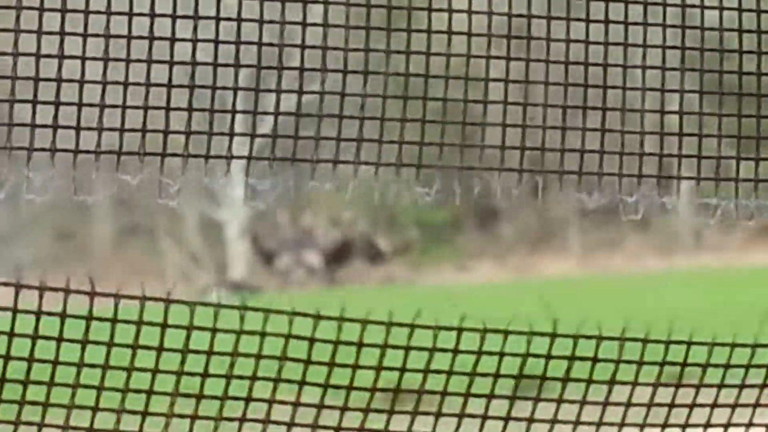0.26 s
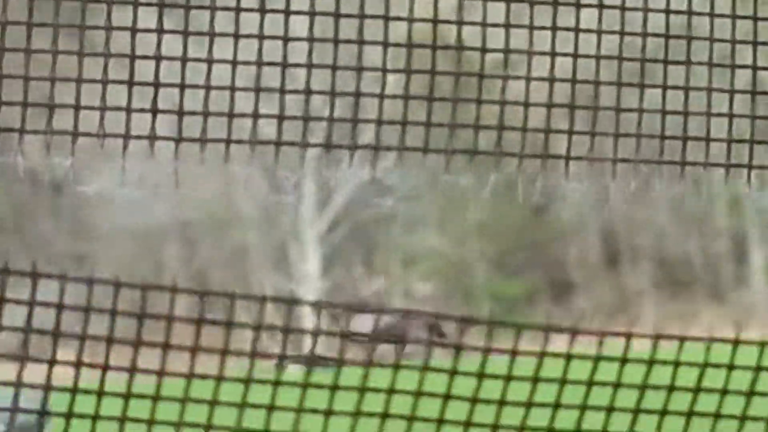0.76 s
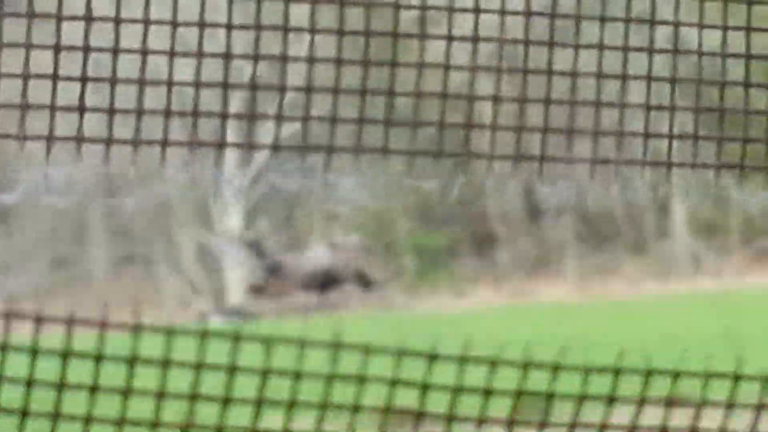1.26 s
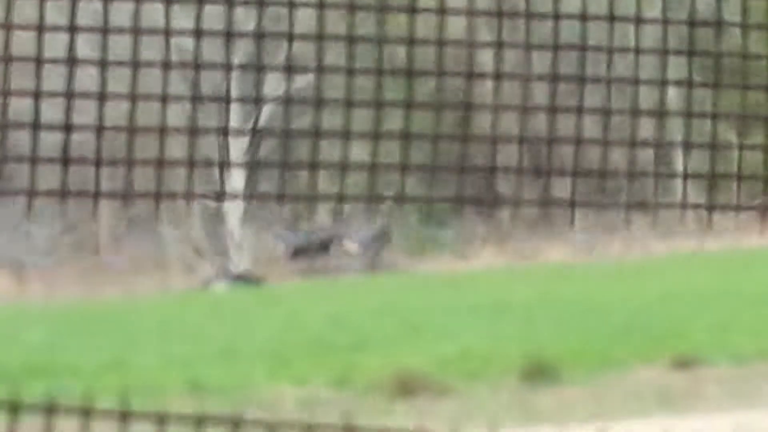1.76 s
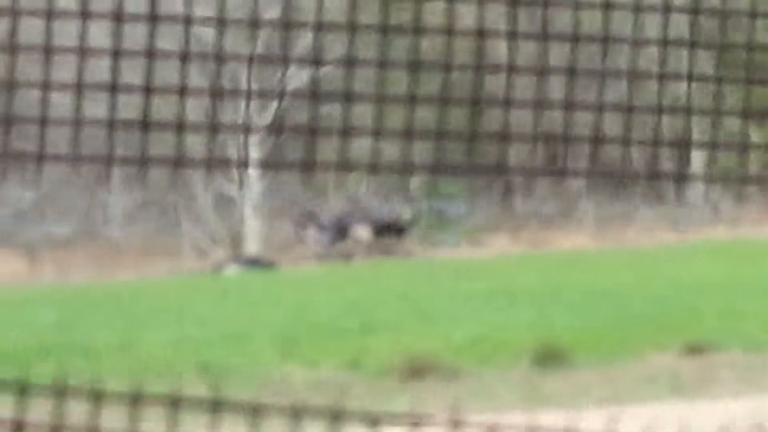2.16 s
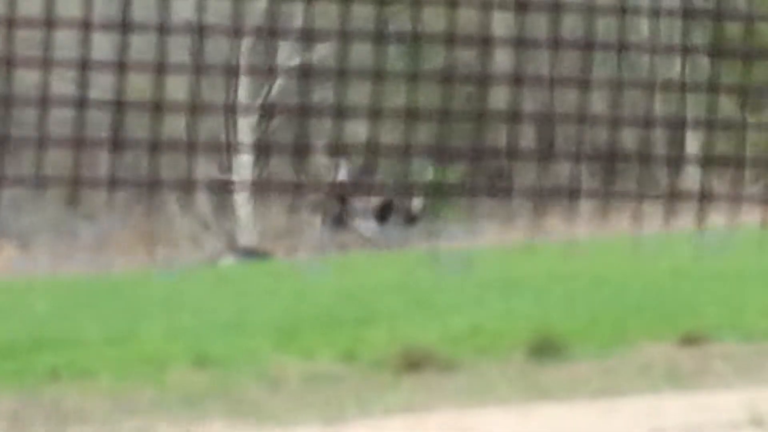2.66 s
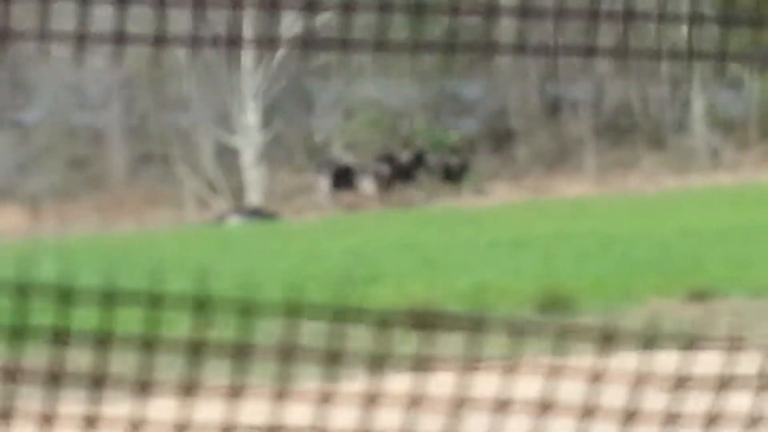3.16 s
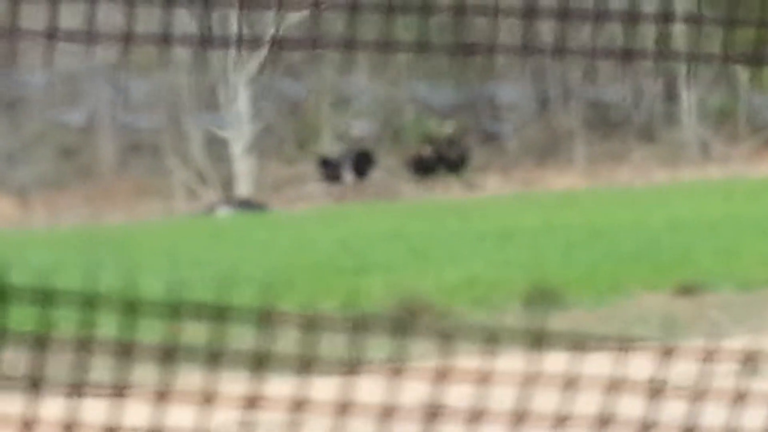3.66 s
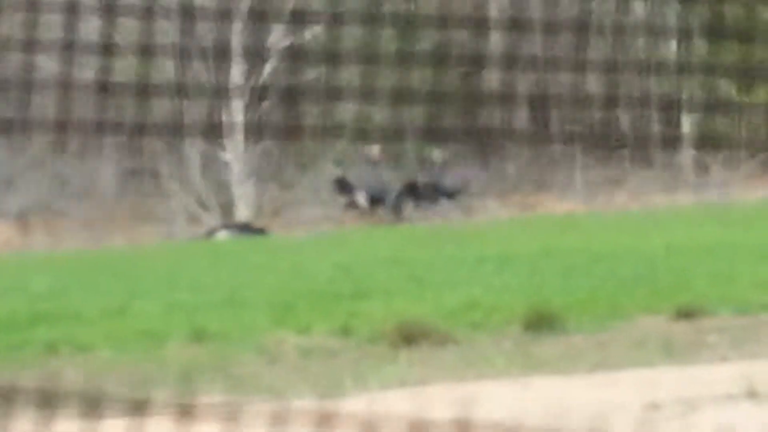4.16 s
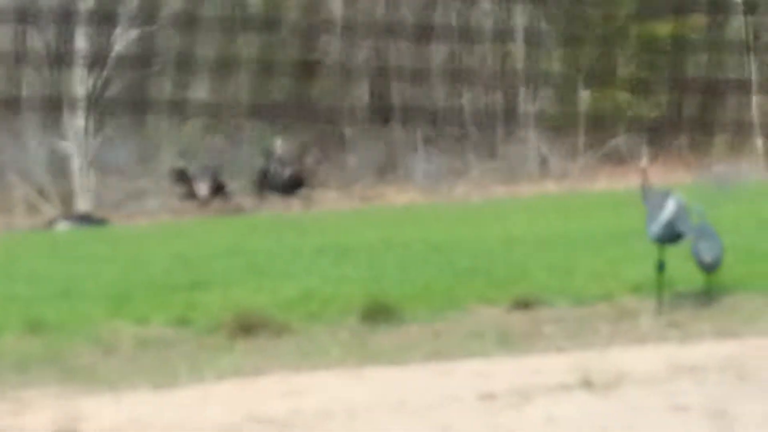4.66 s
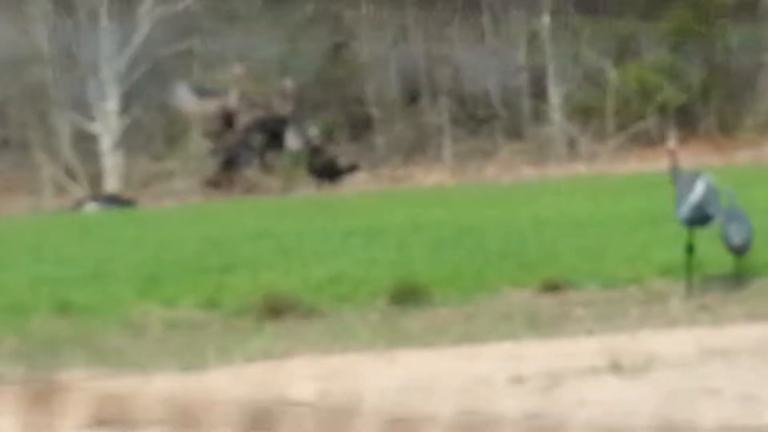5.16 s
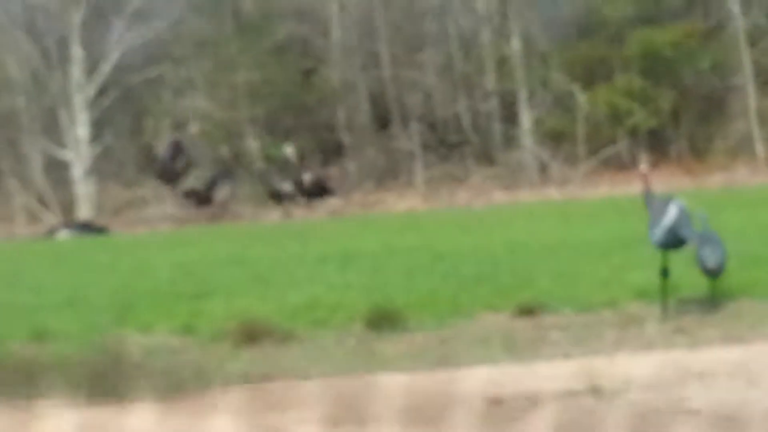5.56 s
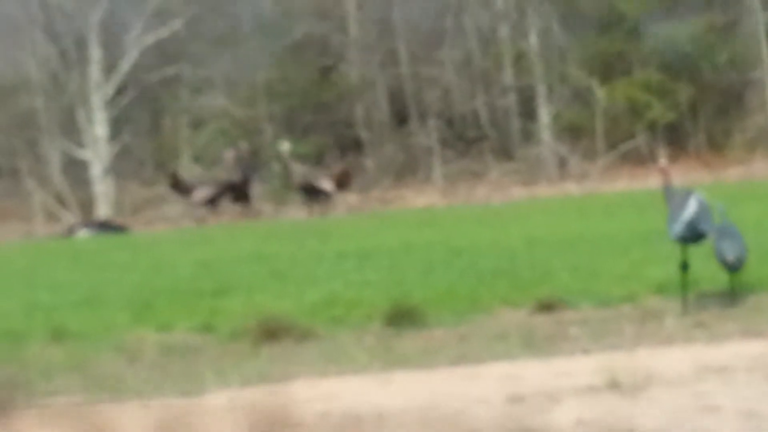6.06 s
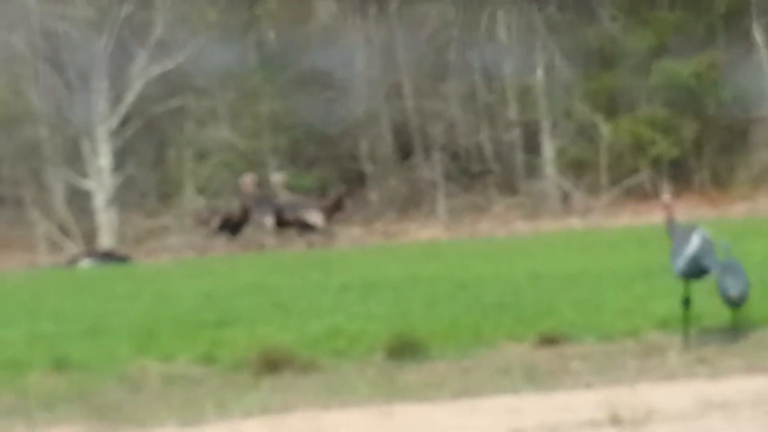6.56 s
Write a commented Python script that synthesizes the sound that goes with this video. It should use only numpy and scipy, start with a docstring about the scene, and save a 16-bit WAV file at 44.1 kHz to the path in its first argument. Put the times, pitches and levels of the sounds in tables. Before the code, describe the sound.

Wild turkeys fight at the far edge of a field, with irregular wing slaps, faint clucks and thin whines. Close to the microphone, the fabric of a hide crackles, mostly on the right, and a hand-held camera creaks, clicks and thuds. From about halfway, a songbird whistles short falling and rising notes in the wood. The slaps and handling noises flare up after five seconds, over a faint low rumble and hiss.

```python
"""The far edge of a field, heard from a cloth hide: wild turkeys fight with wing slaps, clucks and
thin whines, and a songbird whistles in the wood behind. Up close, fabric crackles, mostly on the right,
and a hand-held camera's housing creaks, rings under finger taps and thuds against the hand.
Rumble drifts underneath; field hiss and rustle swell briefly as the recorder's noise suppressor opens."""
import sys
import numpy as np
from scipy import signal
from scipy.fft import rfft, irfft
from scipy.io import wavfile
from scipy.ndimage import uniform_filter1d

SR = 44100
rng = np.random.default_rng(int(sys.argv[2]) if len(sys.argv) > 2 else 0)


def digitize_waveform(pressure):
    """Quantize a signal to 16-bit integers and store it at the path in sys.argv[1].

    Rows of a 2-D input are taken as channels; values are limited to [-1, 1].
    """
    field = np.atleast_2d(pressure).T
    bounded = np.clip(field, -1, 1)
    quanta = np.round(bounded * 32767).astype(np.int16)
    wavfile.write(sys.argv[1], SR, quanta)


N = 299517
T = np.arange(N) / SR

# Tone colours of the three noise beds. Each row: frequency in Hz, relative level in dB.
RUMBLE_COLOUR = [(15, -21), (25, -15), (38, -16), (75, 0.5), (112, -1.5), (182, -4), (300, -23.5),
                 (390, -50), (660, -120)]
FIELD_COLOUR = [(150, -26.5), (260, -6.5), (747, -3.5), (872, -7), (1150, -1.5), (1580, -7.5), (2420, -6.5),
                (3600, -26), (4680, -21), (7920, -120)]
RUSTLE_COLOUR = [(1880, -38), (3200, -11), (3670, -8), (5260, 0.5), (6600, -4), (7760, 0), (9360, -7.5),
                 (13900, -6.5), (14700, -20.5), (15000, -26.5)]
# Width of the beds. Each row: frequency in Hz, share of power common to both microphone ports.
BED_COMMON_SHARE = [(60, 0.99), (200, 0.91), (400, 0.7), (1400, 0.28), (3000, 0.19), (8000, 0.58)]
# Lean of the beds. Each row: frequency in Hz, pan in dB (always left minus right).
BED_PAN = [(60, -2), (110, -1), (200, 2), (380, 6), (700, 0), (1290, 0), (2380, 6), (4400, 4), (8120, -9.5),
           (15000, 1)]
# Slow rides on the beds. Each row: time in seconds, then rumble, field and rustle levels in dB.
BED_LEVELS = [(0, -56.5, -62.5, -66.5), (.3, -57, -65, -60.5), (.62, -60, -67.5, -70),
              (.95, -55.5, -66, -59.5), (1.4, -56, -61.5, -70), (1.75, -56.5, -61.5, -64.5),
              (2.1, -61, -69, -69), (2.4, -57.5, -60, -73.5), (2.645, -50, -50.5, -49.5),
              (2.685, -54, -62, -65), (2.95, -60.5, -64, -65.5), (3.5, -58, -59.5, -58.5),
              (3.9, -56.5, -63, -61), (4.3, -58, -64, -66), (4.85, -62, -64.5, -70),
              (5.15, -48, -53.5, -46), (5.62, -56, -52.5, -53), (5.85, -60, -58.5, -63),
              (6.3, -60, -63.5, -68.5), (6.65, -61, -65.5, -68), (6.79, -54, -56, -78)]
# Background hiss and rustle swell briefly with each sound, as the recorder's noise suppressor opens.
# Each row: crest in seconds, field and rustle levels in dB, seconds to fall 20 dB (a negative value
# cuts the swell short or skips it).
BACKGROUND_SWELLS = [(0.072, -60, -60, 0.47), (0.401, -70, -44, 0.01), (0.452, -63, -45.5, 0.05),
                     (.76, -64.5, -72, 0.15), (0.912, -49, -38, 0.0629), (.95, -52, -47, 0.1),
                     (0.999, -50.5, -44, 0.13), (1.177, -53, -55, 0.11), (1.229, -55.5, -54, 0.08),
                     (1.298, -71, -52.5, 0.2), (1.518, -55, -56, 0.29), (2.32, -64, -64, 0.3),
                     (2.722, -55.5, -45, 0.1743), (2.84, -62, -41, -0.01), (3.19, -64, -61, -0.19),
                     (3.302, -62, -43.5, 0.08), (3.558, -59, -49, 0.05), (3.88, -60, -69, 0.45),
                     (4.29, -68, -60, .1), (4.38, -57.5, -57.5, 0.27), (4.515, -58.5, -61.5, 0.26),
                     (4.588, -52.5, -60, .07), (4.78, -55, -57, 0.19), (4.97, -58.5, -61, -0.3),
                     (5.06, -47, -51, -0.02), (5.137, -35.5, -35, 0.0228), (5.309, -47.5, -45, 0.12),
                     (5.41, -39, -62, 0.01), (5.453, -38.5, -54, 0.03), (5.58, -52, -54, 0.16),
                     (5.99, -60.5, -59, 0.23), (6.408, -56.5, -55, 0.15), (6.6, -56, -57, -0.3),
                     (6.741, -56.5, -55, 0.35)]
# Wing hits. Each row: start in seconds, level in dB, centre in Hz, pan in dB, 60 dB decay in seconds.
WING_SLAPS = [(0.075, -44.5, 1310, 1, 0.081), (0.154, -47, 1210, 17, 0.048),
              (0.392, -30, 2300, 19.5, 0.027), (0.69, -54.5, 1280, 1.0, 0.053),
              (0.846, -36, 2100, 12, 0.026), (0.898, -37.5, 2090, 3, 0.14), (0.999, -40.5, 2260, 6.5, 0.11),
              (1.173, -36, 1900, 2, 0.064), (1.524, -35.5, 1850, 10, 0.041), (1.723, -54.5, 2280, 16, 0.06),
              (1.776, -42.5, 1840, 4, 0.055), (1.937, -50, 1130, 2, 0.048), (2.41, -47, 2170, 4, 0.07),
              (2.492, -56, 1180, 19, 0.096), (2.702, -47, 2270, 7, 0.34), (2.956, -51, 2270, 7, 0.085),
              (3.054, -52.5, 1850, 4.5, 0.15), (3.168, -53.5, 1160, 11, 0.082),
              (3.202, -44.5, 1350, 2, 0.043), (3.273, -53.5, 1370, 3, 0.099), (3.31, -42, 1800, 5, 0.038),
              (3.347, -40.5, 1920, 9, 0.035), (3.386, -46.5, 1370, 4, 0.093), (3.432, -44, 1970, 9, 0.048),
              (3.508, -47, 2000, 2, 0.16), (3.874, -40, 1900, 16, 0.065), (4.024, -49, 1350, 7.5, 0.11),
              (4.149, -48.5, 1920, 3, 0.084), (4.514, -45, 1980, 7, 0.062), (4.576, -45, 2170, 10, 0.031),
              (5.051, -28, 2220, 8.5, 0.049), (5.212, -48, 2270, 6, 0.1), (5.305, -41, 2210, 5, 0.22),
              (5.396, -30, 1970, 8, 0.038), (5.452, -31, 2500, 3, 0.042), (5.75, -44, 1770, 1, 0.086),
              (5.858, -40, 1320, 8, 0.055), (6.295, -53, 1310, 2, 0.055), (6.335, -51, 1300, 4, 0.084),
              (6.37, -49, 1390, 4, 0.087), (6.405, -38.5, 1600, 0, 0.054), (6.709, -51, 1285, 5, 0.2)]
# Fabric snaps. Each row: start in seconds, level in dB, pan in dB, relative tail level in dB.
FABRIC_CRACKLES = [(0.0757, -26.5, -9.5, -19), (0.2562, -42, -3, -9), (.332, -41.5, -6, -12.5),
                   (0.372, -42, 5, -10), (0.3955, -30, 4, -14), (0.8443, -33, -3, -18),
                   (0.8985, -16.5, -10, -14.5), (0.9018, -8, -11.5, -20), (0.9126, -25, 3, -10),
                   (0.9992, -25.5, -2, -13), (1.0572, -38, 0, -9.5), (1.1724, -30.5, -16, -9),
                   (1.1735, -29, 4.5, -11.5), (1.501, -35, -6, -15), (1.519, -52, 21, -9),
                   (2.315, -39.5, -2, -13), (2.701, -47, -6, -23), (2.716, -25.5, -11, -13),
                   (2.7899, -33, -8, -16), (2.833, -32, 1.5, -17.5), (3.1882, -35, -0.5, -14.5),
                   (3.2863, -39.5, -18, -6), (3.5452, -39, -20, -11.5), (3.5641, -35.5, -23, -23),
                   (4.0294, -41.5, -4, -9.5), (4.3729, -40.5, -15, -10.5), (4.78, -38.5, -9, -14.5),
                   (4.9226, -41, 4.5, -11.5), (4.967, -35, 6.5, -13), (5.0503, -23.5, -15.5, -6.5),
                   (5.0704, -30, -10, -26), (5.0946, -32.5, -6, -10.5), (5.1233, -21, -4, -15),
                   (5.1354, -20, -13, -31), (5.1562, -19, -16, -20), (5.164, -32, -13, -10),
                   (5.254, -22.5, -13.5, -16.5), (5.2623, -23.5, -7, -11.5), (5.2983, -23, -12, -14.5),
                   (5.3075, -22.5, -18, -9), (5.316, -31, -7, -26), (5.3484, -32, -11, -10.5),
                   (5.4531, -12.5, -8, -18.5), (5.6331, -34, 0, -14), (5.7948, -44, -5.5, -8.5)]
# Port resonances, a left list and a right list. Each row: centre in Hz, width in Hz, gain in dB.
PORT_MODES = [
    [(5100, 1580, 9.5), (6900, 9800, -6), (11570, 11000, -7)],
    [(5240, 1200, -15), (7550, 1480, 10.5), (9800, 3800, -14)],
]
# Turkey clucks. Each row: start and length in seconds, first pitch, last pitch and throat
# resonance in Hz, level in dB.
TURKEY_CLUCKS = [(.145, 0.035, 900, 1050, 1900, -52), (0.387, 0.012, 591, 563, 2400, -41.5),
                 (0.835, 0.035, 845, 1210, 1900, -45), (1.517, 0.025, 518.5, 517, 1980, -42),
                 (1.618, .025, 1054, 1053, 2100, -58), (1.772, 0.035, 890, 893, 1900, -52.5),
                 (3.27, 0.022, 883, 900, 1600, -66), (3.304, 0.02, 890, 900, 1800, -58),
                 (3.34, 0.024, 880, 900, 2040, -53), (3.379, 0.021, 963, 960, 1710, -61),
                 (3.428, 0.037, 980, 980, 1760, -54), (3.504, .03, 950, 1000, 1900, -56),
                 (3.576, .04, 750, 750, 1600, -57), (3.872, 0.028, 460.4, 464, 1924, -48),
                 (5.854, 0.017, 1266, 1306, 1500, -49)]
# Thuds of the hand. Each row: start in seconds, level in dB, centre in Hz.
HAND_BUMPS = [(0.368, -48, 121), (0.408, -44, 91.5), (0.755, -45, 127), (0.919, -35.5, 91.5),
              (0.943, -39, 199), (1.004, -40, 211), (1.174, -36, 186), (1.519, -49, 116),
              (2.609, -48, 176.4), (2.717, -40, 145), (3.719, -49, 112), (4.588, -45.5, 91.5),
              (5.053, -28.5, 140), (5.205, -38.5, 121), (5.6, -47, 132), (6.388, -43, 116),
              (6.711, -44.5, 118)]
# Taps on the housing. Each row: start in seconds, left level in dB, pan in dB, relative edge level
# in dB, contact time in seconds.
FINGER_TAPS = [(0.371, -45, 10, -30, 0.0012), (1.178, -24, 0, -18, 0.0014), (1.221, -16.5, 11, -30, 0.0017),
               (5.133, -23, 35, -12.5, 0.00028), (5.1363, -2, 41, 2.5, 0.00013),
               (5.4055, -16.5, 12.5, 11.5, 0.00017)]
# The housing's ring. Each row: frequency in Hz, gain in dB, 60 dB decay in seconds.
SHELL_MODES = [(427, -15.5, 0.013), (802, -1, 0.0083), (1466, 4.5, 0.0042)]
# Whines and peeps. Each row: start, crest and end in seconds, the pitch at each in Hz, level in dB.
# A row that ends before it starts is silent.
TURKEY_WHINES = [(1.248, 1.402, 1.47, 1320, 1228, 1150, -68.5), (1.539, 1.556, 1.66, 1566, 1546, 1520, -61),
                 (1.66, 1.717, 1.77, 2416, 2550, 2370, -68), (1.876, 1.962, 1.98, 2260, 2605, 2560, -69.5),
                 (1.75, 1.823, 1.88, 2450, 2590, 2400, -78), (2.002, 2.05, 2.4, 2560, 2605, 2530, -79),
                 (2.1, 2.2, 2.3, 2390, 2605, 2528, -71.5), (2.3, 2.33, 2.36, 2383, 2266, 2290, -57),
                 (2.403, 2.429, 2.4, 2475, 2325, 2600, -66), (2.45, 2.53, 2.55, 2640, 2590, 2542, -66),
                 (2.47, 2.497, 2.49, 3298, 3390, 3228, -63.5),
                 (2.791, 2.828, 2.88, 2431, 2225, 2156, -56.5), (3.01, 3.048, 3.1, 3210, 3390, 3400, -66),
                 (3.628, 3.738, 3.8, 1236, 1265, 1180, -64), (3.65, 3.672, 3.72, 2505, 2506, 2460, -57),
                 (3.73, 3.76, 3.79, 1890, 1870, 1800, -63.5), (4.93, 4.968, 4.4, 1227, 1301, 1301, -69)]
# Runs of ticks. Each row: start in seconds, tick count, first gap in seconds, gap ratio per tick,
# first and last levels in dB, pan in dB.
JOINT_CREAKS = [(2.531, 5, .0118, .98, -33.5, -32.5, 12.5), (2.599, 2, .012, 1, -37, -36, 9),
                (2.6251, 3, .0129, 1.29, -24.5, -26, 15.5), (2.727, 3, .013, 0.95, -30, -22.5, 8),
                (4.5815, 1, .01, 1, -31, -38, 8), (5.5891, 5, .0262, 1.105, -30, -27, 17),
                (6.7222, 4, .011, 1.04, -29.5, -27, 13.5)]
# The songbird's falling notes. Each row: crest in seconds, level in dB, lead-in in seconds.
FALLING_NOTES = [(3.525, -52, 0.011), (3.955, -48, .02), (4.378, -45.5, .006), (4.788, -45, 0.0048),
                 (5.18, -49, .004), (5.585, -43, .02), (6.008, -47.5, 0.023), (6.422, -47, .022)]
# Its rising notes. Each row: crest in seconds, level in dB.
RISING_NOTES = [(3.692, -53), (4.115, -52), (4.544, -51), (4.962, -53), (5.765, -52), (6.17, -55),
                (6.59, -57.5)]
# Contours of the two notes. Each row: seconds from the crest, pitch in Hz, relative level in dB.
FALL_CONTOUR = [(-.02, 2991, -6), (-.013, 2670, -1.5), (-.006, 2473, -0.5), (0, 2403, 0.5),
                (0.014, 2330, -8.5), (0.025, 2500, -19)]
RISE_CONTOUR = [(-.075, 1697, -30), (-.04, 1790, -10.5), (-.018, 1950, -3.5), (0, 2257, 0),
                (.012, 2330, -3), (0.021, 2320, -21)]


def undb(db):
    return 10 ** (np.asarray(db) / 20)


def unit_rms(x):
    return x / np.sqrt(np.mean(x ** 2))


def pan(x, pan_db, lag_samples=5):
    """Place a sound by level; the left port hears it a touch later."""
    return np.array([np.roll(x, lag_samples) * undb(pan_db / 2), x * undb(-pan_db / 2)])


def add(out, x, start):
    i = int(start * SR)
    out[..., i:i + x.shape[-1]] += x[..., :N - i]


def band(x, hz, width_hz):
    return signal.lfilter(*signal.iirpeak(hz, hz / width_hz, SR), x)


def fade(seconds, t60):
    return np.exp(-np.log(1000) * np.arange(int(seconds * SR)) / SR / t60)


def curve_at(table, hz):
    knots_hz, values = np.transpose(table)
    return np.interp(np.log(hz + 1), np.log(knots_hz), values)


def grainy(shape, grain_db):
    """Gritty noise: dense tiny clicks of uneven size."""
    click_db = grain_db * np.minimum(rng.exponential(size=shape), 5.5)
    return unit_rms(rng.standard_normal(shape) * undb(click_db))


def noise_bed(colour, grain_db, flicker_db):
    """Coloured stereo noise, partly common to both ports, with a flickering level."""
    hz = np.fft.rfftfreq(N, 1 / SR)
    share = curve_at(BED_COMMON_SHARE, hz)
    common = np.sqrt(share) * rfft(pan(grainy(N, grain_db), 0))
    wide = np.sqrt(1 - share) * rfft(grainy((2, N), grain_db))
    eq_db = curve_at(colour, hz) + curve_at(BED_PAN, hz) * np.array([[.5], [-.5]])
    steps = np.repeat(rng.standard_normal(N // 900 + 1), 900)
    flicker = 1.22 * uniform_filter1d(steps, size=900)[:N]
    return unit_rms(irfft((common + wide) * undb(eq_db), N)) * undb(flicker_db * flicker)


def swell(slow_gain, swell_levels):
    """The noise suppressor opens at the listed times: a bed comes up fast, then sinks to its slow gain."""
    power = slow_gain ** 2
    for (crest, _, _, fall), db in zip(BACKGROUND_SWELLS, swell_levels):
        span = slice(max(int((crest - .2) * SR), 0), int((crest + 2 * fall) * SR))
        since_crest = T[span] - crest
        rise = .17 * fall + .02
        drop_db = 20 * np.where(since_crest > 0, since_crest / fall, -since_crest / rise)
        power[span] += undb(db - drop_db) ** 2
    return np.sqrt(power)


def ambience():
    """Distant rumble, the air of the open field, and cloth rustling close by."""
    times, *levels = np.transpose(BED_LEVELS)
    rumble_gain, field_gain, rustle_gain = [undb(np.interp(T, times, db)) for db in levels]
    _, field_swells, rustle_swells, _ = np.transpose(BACKGROUND_SWELLS)
    rumble = noise_bed(RUMBLE_COLOUR, grain_db=.3, flicker_db=2.8) * rumble_gain
    field = noise_bed(FIELD_COLOUR, grain_db=1.5, flicker_db=3) * swell(field_gain, field_swells)
    rustle = noise_bed(RUSTLE_COLOUR, grain_db=3, flicker_db=1.5) * swell(rustle_gain, rustle_swells)
    return rumble + field + rustle


def wing_slaps():
    """Feathers meet in a ragged burst of air, dulled by distance."""
    out = np.zeros((2, N))
    for start, db, hz, pan_db, t60 in WING_SLAPS:
        envelope = fade(.2, t60) * (1 - fade(.2, .028))
        air = grainy(len(envelope), grain_db=1.5)
        smack = unit_rms(band(band(air, hz, 1100), hz, 1100))
        body = undb(-6.5) * unit_rms(band(air, 1200, 1350))
        add(out, pan((smack + body) * envelope, pan_db) * undb(db), start)
    return out


def with_wood_echo(x, t60, wet_db):
    """Trunks scatter the sound back as a dull fading cloud, different at each port."""
    cloud = band(rng.standard_normal((2, SR)), 2200, 4380) * fade(1, t60)
    cloud /= np.sqrt(np.sum(cloud ** 2) / 2)
    return x + undb(wet_db) * signal.fftconvolve(x, cloud, axes=1)[:, :N]


def fabric_crackles():
    """Cloth gives, a fibre snaps, smaller ones follow; each port rings in its own way."""
    out = np.zeros((2, N))
    for start, db, pan_db, tail_db in FABRIC_CRACKLES:
        envelope = fade(.2, t60=.14) * (1 - fade(.2, .0037))
        crackle = grainy(len(envelope), grain_db=5) * envelope * undb(tail_db)
        crackle[60:62] += [2.2, -2.2]  # the snap
        add(out, pan(crackle, pan_db) * undb(db), start)
    return np.array([sum(undb(db) * band(band(side, hz, width), hz, 2 * width) for hz, width, db in modes)
                     for side, modes in zip(out, PORT_MODES)])


def turkey_clucks():
    """Short voiced bursts: a shaky stack of harmonics shaped by the throat."""
    out = np.zeros(N)
    for start, length, first_hz, last_hz, throat_hz, db in TURKEY_CLUCKS:
        hz = np.linspace(first_hz, last_hz, int(length * SR))
        shake = 1 + .04 * unit_rms(uniform_filter1d(rng.standard_normal(len(hz)), size=60))
        phase = 2 * np.pi * np.cumsum(hz * shake) / SR
        voice = np.zeros(len(hz))
        for k in range(1, 11):
            throat = 1 / (1 + ((k * hz - throat_hz) / 700) ** 2)
            presence = undb(-10) / (1 + ((k * hz - 4400) / 600) ** 2)
            voice += (throat + presence) * np.cos(k * phase)
        add(out, unit_rms(voice) * signal.windows.tukey(len(hz), .6) * undb(db), start)
    return out


def hand_bumps():
    """Muffled thuds, carried by the camera body to both ports alike."""
    out = np.zeros(N)
    envelope = fade(.2, t60=.096) * (1 - fade(.2, .042))
    for start, db, hz in HAND_BUMPS:
        thud = unit_rms(band(band(rng.standard_normal(len(envelope)), hz, 260), hz, 260))
        add(out, thud * envelope * undb(db), start)
    return out


def finger_taps():
    """A fingertip lands with a sharp edge and rings the shell."""
    out = np.zeros((2, N))
    t = np.arange(int(.1 * SR)) / SR
    ring = sum(undb(db) * np.sin(2 * np.pi * hz * t) * fade(.1, t60) for hz, db, t60 in SHELL_MODES)
    ring = signal.lfilter(*signal.butter(2, 220, "high", fs=SR), ring)  # a small shell radiates no bass
    edge = -np.sin(2 * np.pi * 5200 * t) * fade(.1, .002)
    for start, left_db, pan_db, edge_db, contact in FINGER_TAPS:
        push = np.hanning(int(contact * SR) + 3)  # a softer, longer push rings only the low modes
        knock = np.convolve(ring, push / push.sum())
        db = left_db - pan_db / 2
        add(out, pan(knock, pan_db) * undb(db), start)
        add(out, pan(edge, pan_db) * undb(db + edge_db), start - .0003)
    return out


def whistle(notes, octave_db, waver_db):
    """Near-sine notes through (seconds, Hz, dB) points; turbulent air makes the level waver."""
    out = np.zeros(N)
    for note in notes:
        times, hz, db = np.transpose(note)
        t = np.arange(times[0], times[-1], 1 / SR)
        phase = 2 * np.pi * np.cumsum(np.interp(t, times, hz)) / SR
        tone = np.sin(phase) + undb(octave_db) * np.sin(2 * phase)
        waver = unit_rms(uniform_filter1d(rng.standard_normal(len(t)), size=90))
        envelope = undb(np.interp(t, times, db) + waver_db * waver) * signal.windows.tukey(len(t), .2)
        add(out, np.sqrt(2) * tone * envelope, times[0])
    return out


def turkey_whines():
    """Thin calls that swell and fade; the low ones carry a stronger octave."""
    low, high = [], []
    for start, crest, end, start_hz, crest_hz, end_hz, db in TURKEY_WHINES:
        if end > start:
            note = [(start, start_hz, db - 8.5), (crest, crest_hz, db), (end, end_hz, db - 11)]
            (low if crest_hz < 2000 else high).append(note)
    return whistle(low, octave_db=-19, waver_db=4.5) + whistle(high, octave_db=-28, waver_db=4.5)


def joint_creaks(scatter_db=2):
    """A plastic joint slips in runs of ticks, each a one-sided pulse with a faint noisy tail."""
    ticks = []
    for start, count, first_gap, growth, first_db, last_db, pan_db in JOINT_CREAKS:
        gaps = first_gap * growth ** np.arange(count)
        times = start + np.cumsum(gaps) - gaps
        levels = np.linspace(first_db, last_db, count) + scatter_db * rng.standard_normal(count)
        ticks += [(at, db, pan_db) for at, db in zip(times, levels)]
    out = np.zeros((2, N))
    t = np.arange(int(.1 * SR)) / SR
    for start, db, pan_db in ticks:
        slip = np.exp(-t / .00005) + undb(-16) * rng.standard_normal(len(t)) * fade(.1, .031)
        tick = np.convolve(slip, np.hanning(6) / 2)
        add(out, pan(tick, pan_db) * undb(db), start)
    return out


def songbird(top_hz=2922, top_db=-9.5):
    """Whistled notes hang briefly at the top and drop; rising notes answer them."""
    falls = [np.array([(FALL_CONTOUR[0][0] - lead_in, top_hz, top_db)] + FALL_CONTOUR) + [crest, 0, db]
             for crest, db, lead_in in FALLING_NOTES]
    rises = [np.array(RISE_CONTOUR) + [crest, 0, db] for crest, db in RISING_NOTES]
    calls = pan(whistle(falls, octave_db=-38, waver_db=3.5), pan_db=8)
    answers = pan(whistle(rises, octave_db=-33, waver_db=5.5), pan_db=6.5)
    return calls + answers


def scene():
    """Far birds, close handling; the songbird sits among the trees, so its echo is stronger and longer."""
    fight = pan(turkey_whines(), pan_db=7.5) + pan(turkey_clucks(), pan_db=-1.5) + wing_slaps()
    birds = with_wood_echo(songbird(), t60=.31, wet_db=-9) + with_wood_echo(fight, t60=.2, wet_db=-12)
    return birds + ambience() + fabric_crackles() + joint_creaks() + finger_taps() + hand_bumps()


def record(dry, gate_depth_db=2.5, gate_open_db=-51, gate_range_db=5.5, top_hz=15000):
    """Microphone chain: low cut, a gentle gate on quiet moments, a hard ceiling, high cut."""
    low_cut = signal.sosfilt(signal.butter(2, 45, "high", fs=SR, output="sos"), dry)
    sidechain = signal.sosfilt(signal.butter(2, 500, "high", fs=SR, output="sos"), low_cut)
    level_db = 10 * np.log10(uniform_filter1d(np.mean(sidechain ** 2, axis=0), size=1400) + 1e-12)
    gated = low_cut * undb(gate_depth_db * np.clip((level_db - gate_open_db) / gate_range_db, -1, 0))
    return signal.sosfilt(signal.ellip(6, .2, 50, top_hz, fs=SR, output="sos"), np.clip(gated, -1, 1))


dry = scene()
out = record(dry)
digitize_waveform(out)
```